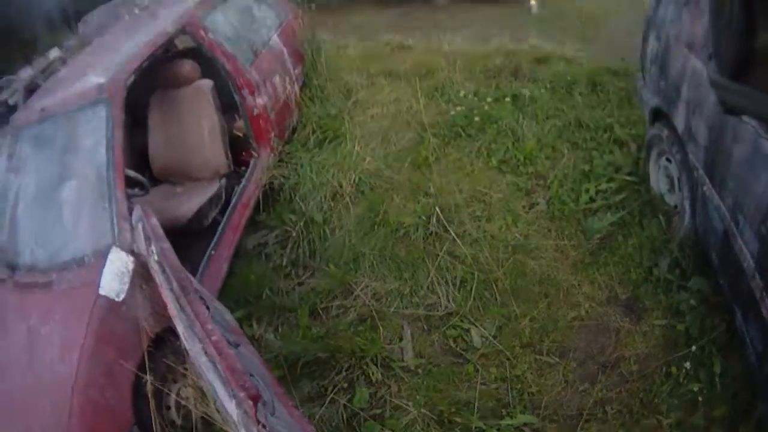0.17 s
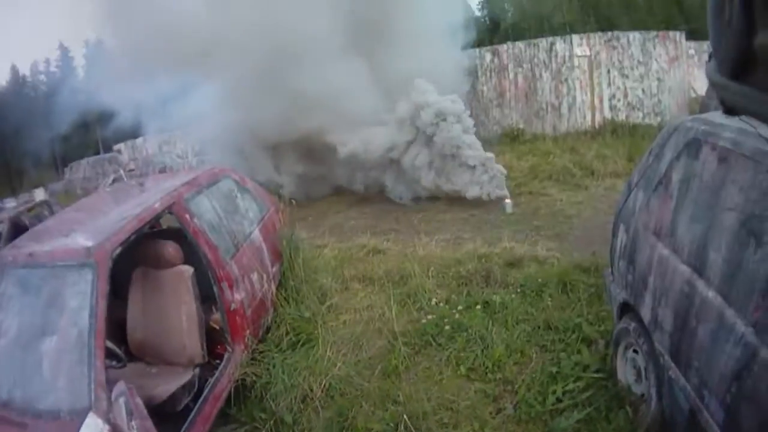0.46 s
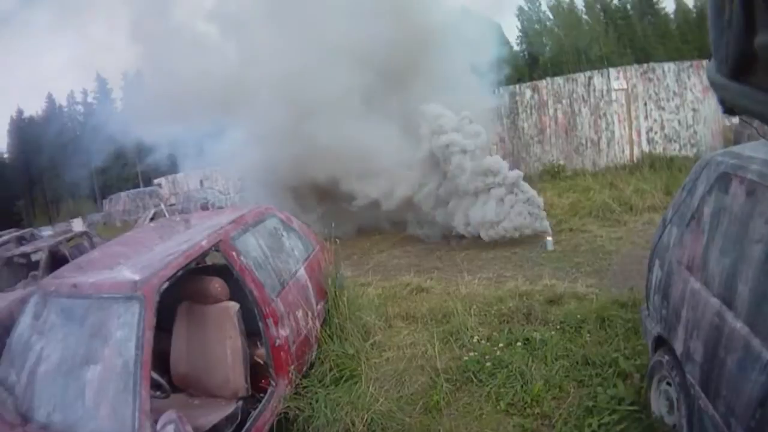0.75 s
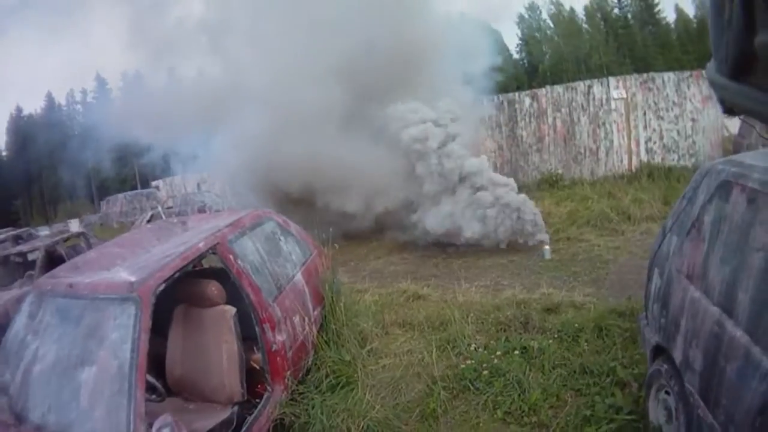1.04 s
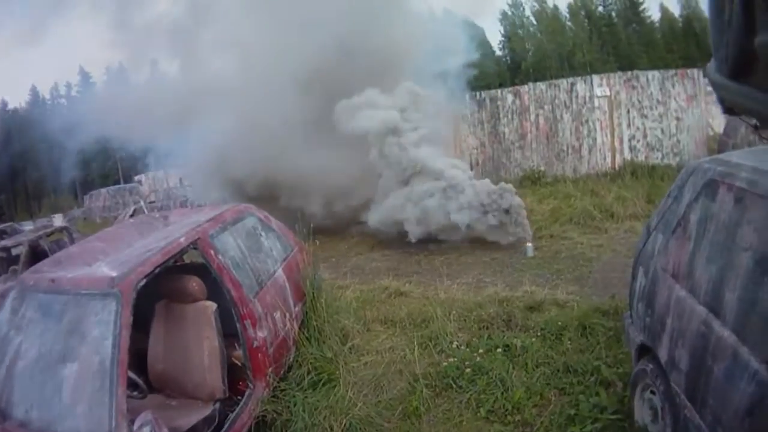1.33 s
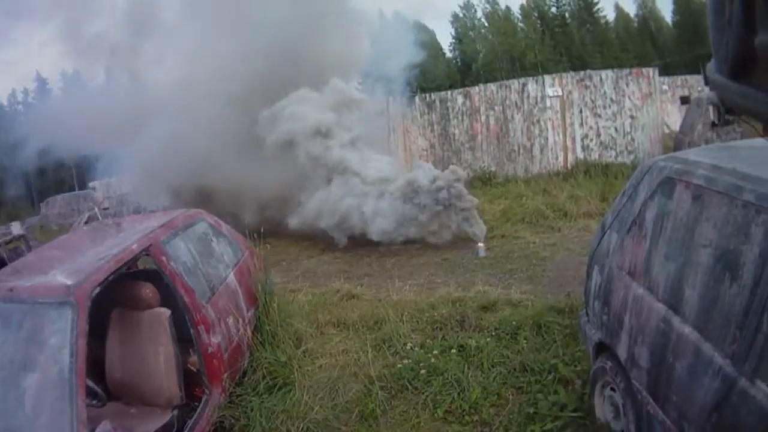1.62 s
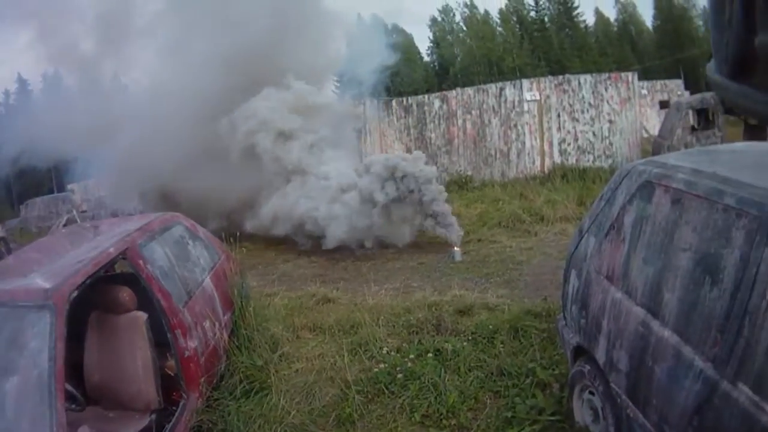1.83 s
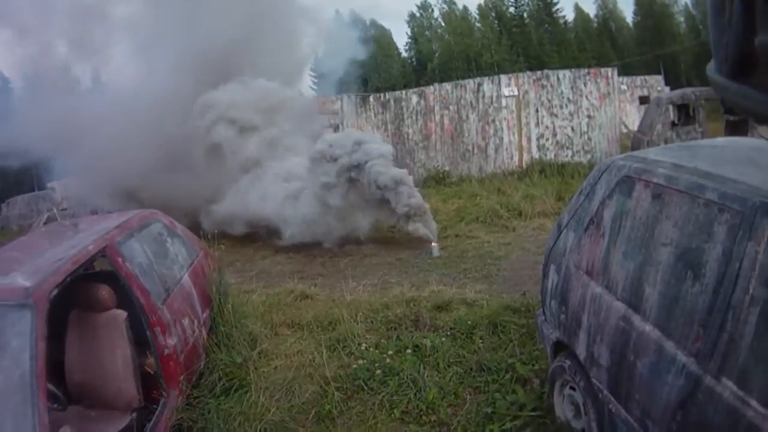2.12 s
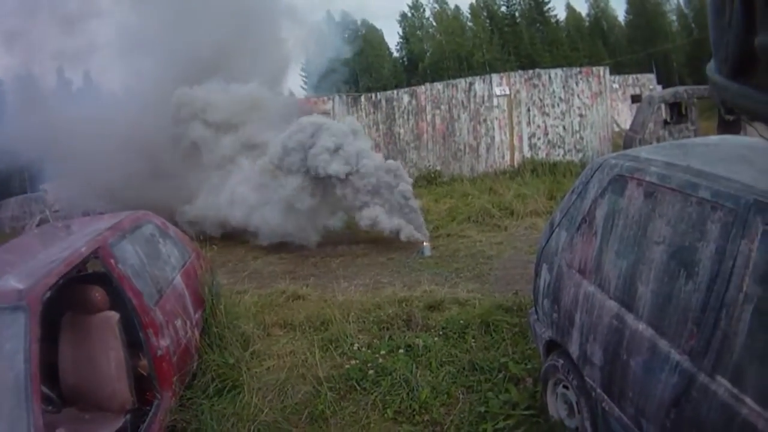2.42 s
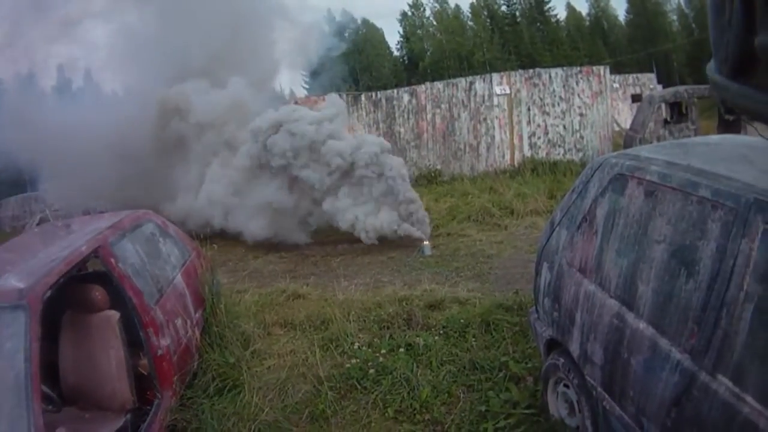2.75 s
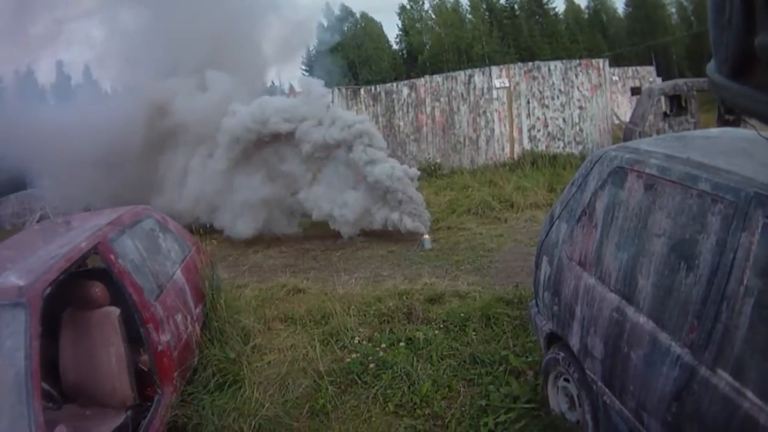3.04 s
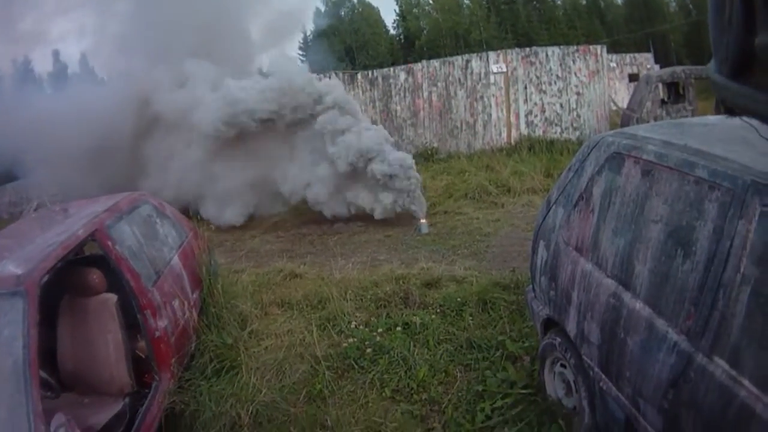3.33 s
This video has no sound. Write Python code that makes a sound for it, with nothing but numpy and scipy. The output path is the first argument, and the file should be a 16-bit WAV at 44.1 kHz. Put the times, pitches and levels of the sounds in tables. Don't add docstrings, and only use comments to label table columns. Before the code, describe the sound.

Continuous pressurized hiss of a smoke canister outdoors, with faint low wind puffs on the microphone

```python
import sys
import numpy as np
from scipy import signal
from scipy.io import wavfile
from scipy.ndimage import uniform_filter1d, map_coordinates

SR = 44100
rng = np.random.default_rng(int(sys.argv[2]) if len(sys.argv) > 2 else 0)


def store_pcm(level_fs):
    pcm = np.round(np.clip(level_fs, -1, 1) * 32767).astype(np.int16)
    wavfile.write(sys.argv[1], SR, np.atleast_2d(pcm).T)


def nominal_scale(level):
    x = np.asarray(level, float) / 20
    return 10 ** x


N = 153468


def unit(x):
    return x / np.sqrt(np.mean(x ** 2) + 1e-20)


def along(points, hz):
    f, v = np.transpose(points)
    return np.interp(np.log(hz + 1), np.log(f + 1), v)


def bells(table, hz):
    return sum(db * np.exp(-.5 * ((hz - centre_hz) / width_hz) ** 2) for centre_hz, width_hz, db in table)


def curves(rows, t):
    s, *cols = np.transpose(rows)
    return [np.interp(t, s, c) for c in cols]


def wobble(rate):
    knots = rng.standard_normal(int(N * rate / SR) + 4)
    return map_coordinates(knots, [np.arange(N) * rate / SR])


def coloured(colour_db):
    hz, t, z = signal.stft(rng.standard_normal(N), SR, nperseg=2048, noverlap=1536)
    shaped = z * nominal_scale(colour_db(hz[:, None], t))
    return unit(signal.istft(shaped, SR, nperseg=2048, noverlap=1536)[1][:N])


def patchy(depth_db, size):
    def field(hz, t):
        eddies = rng.standard_normal((len(hz), len(t)))
        eddies = uniform_filter1d(eddies, size=size, axis=0)
        eddies = uniform_filter1d(eddies, size=5, axis=1)
        return depth_db * unit(eddies) * np.clip(hz / 8000, .2, 1.5)
    return field


def jet():
    # t/s, level/dB
    jet_level = [
        (0, -43),
        (.1, -43.5),
        (.25, -41.5),
        (.4, -41),
        (.8, -42.5),
        (1.5, -42),
        (2.3, -41.5),
        (2.8, -41),
        (3.48, -40.5),
    ]
    # t/s, looking down/0-1, half raised/0-1, leaning away/0-1
    head_pose = [(0, 1, 0.3, 0), (.15, 0.97, 0.1, 0), (.3, 1, .1, 0.2), (.4, 0.35, 1, 0.34),
                 (.55, 0.04, 0.85, 0.36), (.75, 0, 1, 0.7), (.9, 0, 0, 1), (1.4, 0.1, 0, 1),
                 (1.7, 0.04, 0, 0.4), (2.2, 0.09, 0.35, 0), (2.8, 0.02, 0.1, 0), (3.48, 0.13, 0, 0)]
    # f/Hz, level/dB
    plume = [(30, -42.5), (150, -17.5), (500, -16), (1250, -23.5), (3500, -11.5), (6500, -16.5),
             (9500, -27), (15000, -32)]
    # f/Hz, width/Hz, lift/dB
    housing = [(268.5, 42.4, 6), (564.5, 122, 18), (803, 40.6, 11), (1066, 18, 4.5), (1410, 39, 4),
               (1812, 105, 5), (2266, 128, 11), (2602, 98, 6.5), (3274, 151, 6.5), (3609, 104, 7.5),
               (4085, 215, 11), (4730, 205, -3.5), (5470, 340, -2)]
    # f/Hz, width/Hz, lift/dB
    port = [(5950, 140, 2), (6340, 230, 8), (7103, 307, 8), (7605, 217, 7.5), (8420, 330, 6.5),
            (9170, 250, -3), (9670, 64, 4), (10200, 100, -1.5), (10350, 64, 11), (10860, 200, 10.5),
            (11430, 220, 4.5), (12050, 150, 3), (12600, 300, -2), (14100, 290, 4.5)]
    # f/Hz, width/Hz, lift/dB
    notches = [(363, 26, -3.5), (701, 17.7, -9), (1197, 34, -7), (1524, 35, -4.5), (2810, 40, -3),
               (3080, 30, -2.5), (3795, 36, -2), (4720, 50, -3), (5200, 60, -2), (6800, 53, -2),
               (8230, 51, -1), (9760, 50, -1), (10250, 50, -5.5), (12050, 80, -4)]
    # f/Hz, width/Hz, lift/dB
    looking_down = [(785, 73, -3), (9800, 380, 3), (1125, 92, 9), (1520, 220, -2.5), (2010, 92, -1),
                    (2490, 490, -4.5), (2650, 64, -4), (3400, 200, -2.5), (5300, 200, -7.5),
                    (6170, 310, -7.5), (7100, 230, 5.5), (7830, 200, -10), (11600, 320, 3),
                    (12800, 700, 2.5)]
    # f/Hz, width/Hz, lift/dB
    half_raised = [(4000, 500, -1), (6650, 200, -1), (11000, 500, -0.5), (7700, 250, 3), (9200, 200, 7),
                   (9780, 240, 6), (13700, 500, 3.5)]
    # f/Hz, width/Hz, lift/dB
    leaning = [(2250, 160, -0.5), (3370, 250, -1.5), (7400, 420, -5.5), (9400, 380, 3), (6700, 250, 1),
               (12600, 150, 6), (14200, 490, 4.5)]
    glide = 0.051
    shadow_s, shadow_length_s = .36, .08
    shadow_hz, shadow_hz_per_s, shadow_width_hz, shadow_db = 12300, 32000, 1300, -7

    def colour(hz, t):
        down, raised, lean = curves(head_pose, t)
        fixed = along(plume, hz) + bells(housing, hz) + bells(port, hz) + bells(notches, hz)
        pose = down * bells(looking_down, hz / (1 + glide * (1 - down)))
        pose = pose + raised * bells(half_raised, hz) + lean * bells(leaning, hz)
        sweep_hz = shadow_hz + shadow_hz_per_s * (t - shadow_s)
        sweep = bells([(sweep_hz, shadow_width_hz, shadow_db)], hz)
        shadow = sweep * np.exp(-.5 * ((t - shadow_s) / shadow_length_s) ** 2)
        return fixed + pose + shadow + patchy(depth_db=.5, size=12)(hz, t)

    level_db, = curves(jet_level, np.arange(N) / SR)
    slow_flutter_db = 0.19 * wobble(4.1)
    fast_flutter_db = .5 * wobble(24.94)
    return nominal_scale(level_db + slow_flutter_db + fast_flutter_db) * coloured(colour)


def wind():
    # t/s, level/dB
    breeze = [
        (0, -86),
        (.15, -86),
        (.45, -76),
        (.9, -75),
        (1.4, -81),
        (1.9, -83),
        (2.4, -86),
        (3.0, -83),
        (3.48, -82),
    ]
    # f/Hz, level/dB
    thump = [(20, -12), (45, 4), (80, -2), (140, -6), (220, -23), (400, -57)]
    # t/s, peak level/dB, f/Hz
    puffs = [(.2, -71, 45), (.47, -65, 85), (.69, -64, 45), (.775, -53, 95), (.9, -64, 45), (1.14, -71, 60),
             (1.31, -59, 60), (1.37, -64, 55), (1.52, -63, 60), (1.8, -66, 50), (2.49, -68, 55),
             (3.0, -70, 45), (3.28, -69, 33)]
    half_length_cycles = 0.45

    t = np.arange(N) / SR
    level_db, = curves(breeze, t)
    lumps = nominal_scale(2 * wobble(12.8))
    rumble = nominal_scale(level_db) * unit(lumps * coloured(lambda hz, t: along(thump, hz)))
    pushes = np.zeros(N)
    for s, peak_db, pitch_hz in puffs:
        cycles = (t - s) * pitch_hz
        swell = np.exp(-.5 * (cycles / half_length_cycles) ** 2)
        pushes += nominal_scale(peak_db) * np.sin(2 * np.pi * cycles) * swell
    return rumble + pushes


def scene():
    mono = jet() + wind()
    return np.array([mono, mono])


def roll_off(x):
    return signal.sosfilt(signal.butter(12, 15230, fs=SR, output="sos"), x)


def record(dry):
    # f/Hz, level relative to the sound/dB
    channel_mismatch = [(20, -54), (500, -70), (8500, -61), (9300, -25), (10800, -36), (12200, -17),
                        (13200, -30), (14100, -16), (14800, -26)]
    # t/s, low f/Hz, high f/Hz, level relative to the sound/dB
    parting = [
        (1.23, 4240, 5200, 3),
        (1.23, 13000, 14500, -5),
        (2.3, 9700, 13800, 0),
        (2.53, 5700, 7700, 2),
    ]
    parting_s = 0.0071

    hz, t, z = signal.stft(dry[0], SR, nperseg=1024)
    hz = hz[:, None]
    share = nominal_scale(along(channel_mismatch, hz) + patchy(depth_db=6, size=8)(hz, t))
    for s, low_hz, high_hz, db in parting:
        band = (hz > low_hz) & (hz < high_hz)
        share = share + nominal_scale(db) * band * np.exp(-.5 * ((t - s) / parting_s) ** 2)
    spin = np.exp(2j * np.pi * rng.random(z.shape))
    mismatch = signal.istft(z * share * spin, SR, nperseg=1024)[1][:N]
    return roll_off(dry + [mismatch, -mismatch])


dry = scene()
out = record(dry)
store_pcm(out)
```